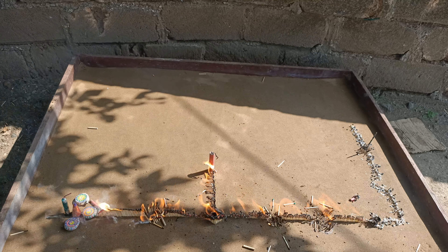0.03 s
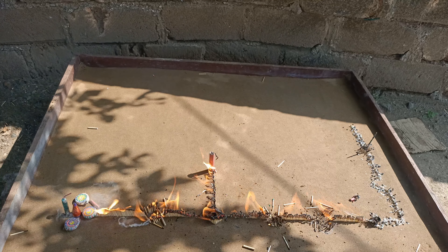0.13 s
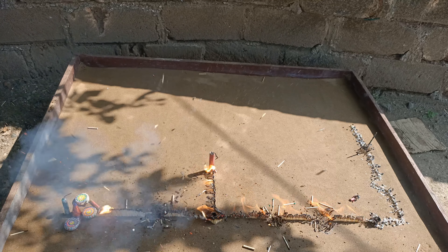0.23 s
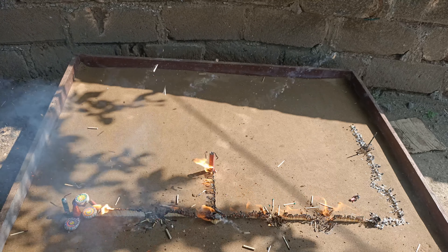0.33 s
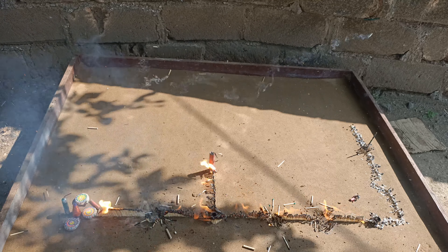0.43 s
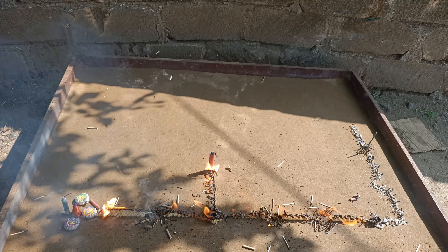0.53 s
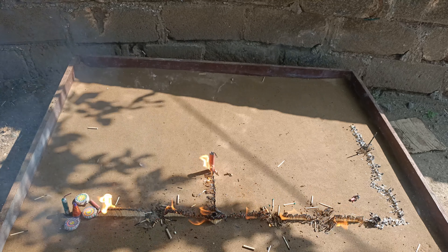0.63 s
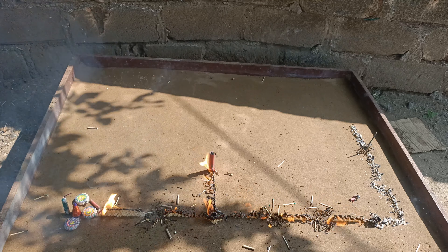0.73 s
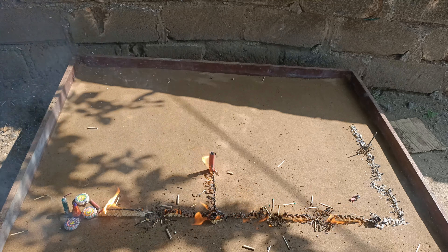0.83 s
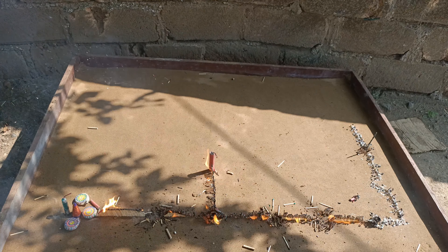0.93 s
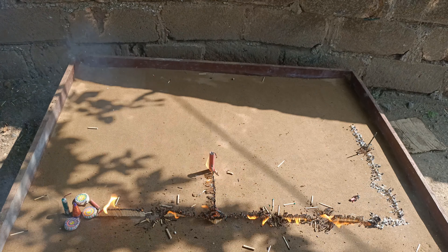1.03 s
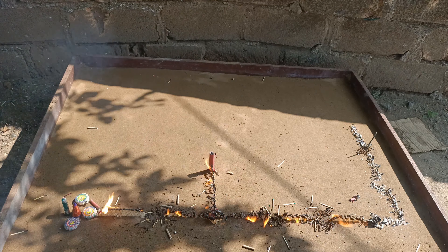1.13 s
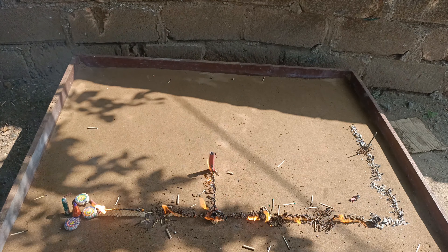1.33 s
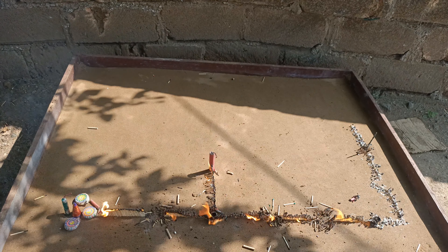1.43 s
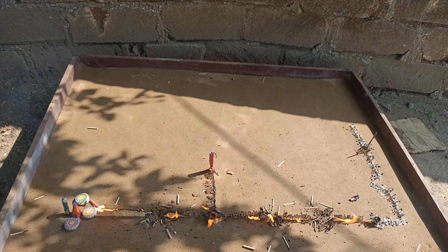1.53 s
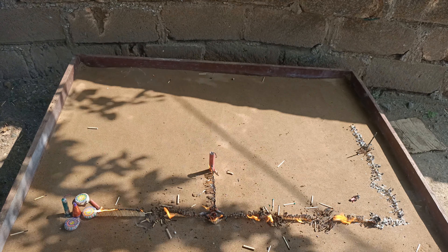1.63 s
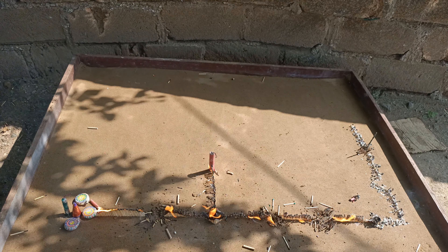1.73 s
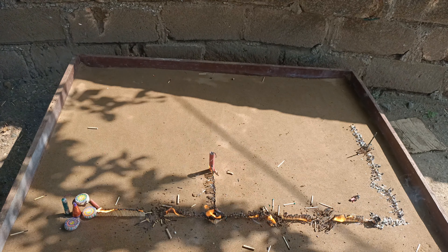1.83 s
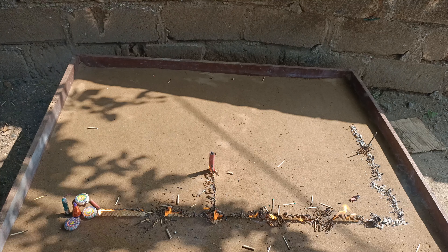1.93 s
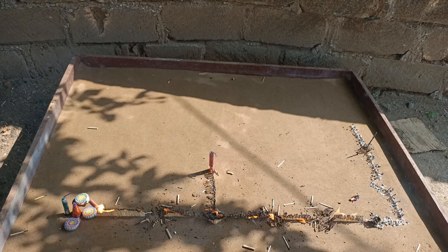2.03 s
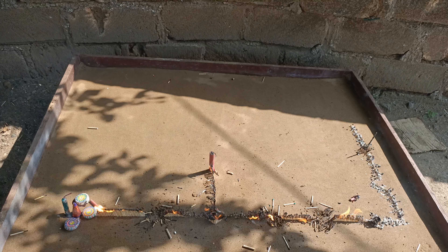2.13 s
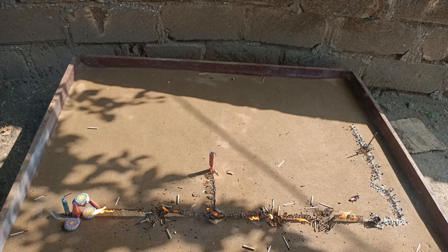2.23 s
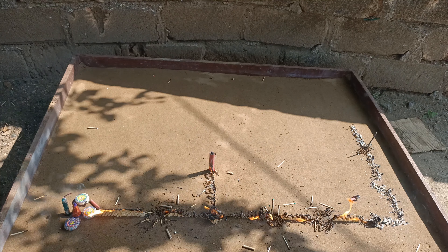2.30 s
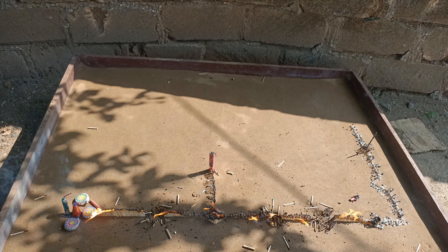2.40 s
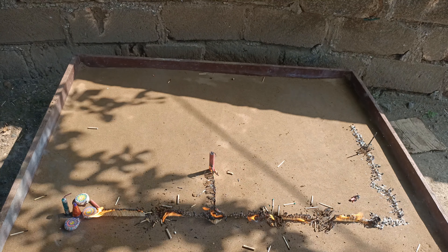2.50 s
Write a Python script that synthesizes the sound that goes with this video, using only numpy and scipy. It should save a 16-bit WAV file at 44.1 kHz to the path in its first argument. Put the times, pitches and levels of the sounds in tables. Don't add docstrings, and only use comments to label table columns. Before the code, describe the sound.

After a quiet moment of thin fizzing, a single firecracker cracks violently near a stereo microphone outdoors. Walls throw back a dense, boxy echo, a thin metal ring lingers faintly, then low wind bumps and quiet air.

```python
import sys
import numpy as np
from scipy import signal
from scipy.fft import rfft, irfft
from scipy.io import wavfile
from scipy.ndimage import uniform_filter1d, map_coordinates

SR = 44100
rng = np.random.default_rng(int(sys.argv[2]) if len(sys.argv) > 2 else 0)


def gain_from_db(level_db):
    decades = np.asarray(level_db, float) / 20
    return 10 ** decades


def master(y):
    cut = np.clip(np.atleast_2d(y).T, -1, 1)
    pcm = np.round(cut * 32767)
    wavfile.write(sys.argv[1], SR, pcm.astype(np.int16))


N = 110250
T = np.arange(N) / SR
BANG_S = .2296


def unit(x):
    return x / np.sqrt(np.mean(x ** 2) + 1e-20)


def along(points, hz):
    f, v = np.transpose(points)
    return np.interp(np.log(hz + 1), np.log(f + 1), v)


def curves(rows):
    s, *cols = np.transpose(rows)
    return [np.interp(T, s, c) for c in cols]


def wobble(rate):
    knots = rng.standard_normal(int(N * rate / SR) + 4)
    return map_coordinates(knots, [T * rate])


def panned(x, pan_db):
    left_db, right_db = np.minimum(pan_db, 0), np.minimum(-pan_db, 0)
    return x * gain_from_db(np.array([left_db, right_db])).reshape(2, -1)


def rush(spectrum, alike, lag_s=0):
    hz = np.fft.rfftfreq(N, 1 / SR)
    a, b = rfft(rng.standard_normal((2, N))) * gain_from_db(along(spectrum, hz))
    turn = np.arccos(np.clip(along(alike, hz), -1, 1)) / 2
    lag = np.exp(-1j * np.pi * hz * lag_s)
    mid, side = a * np.cos(turn), b * np.sin(turn)
    return unit(irfft([(mid + side) * lag, (mid - side) / lag], N))


def burst(s, hz, length_s):
    return np.exp(-.5 * ((T - s) / length_s) ** 2) * np.cos(2 * np.pi * hz * (T - s))


def ring(hz, db, t60, swell_s, shake):
    t = np.maximum(T - BANG_S, 0)
    phase = shake * (wobble(hz / 25) + 0.4 * np.array([wobble(35), wobble(4)]))
    decay = gain_from_db(db - 60 * t / t60 + 1.2 * wobble(29))
    return decay * (1 - np.exp(-t / swell_s)) * np.sin(2 * np.pi * hz * t + phase)


# pitch_hz, level_db [dB per Hz]
AIR_COLOUR = [(100, -32.5), (150, -8), (280, -23), (420, -15), (1000, -22.5), (3500, -24.5), (6500, -36),
              (15800, -42.5)]
# pitch_hz, likeness [-1..1]
AIR_LIKENESS = [(60, 0.08), (180, 0.53), (550, 0.056), (1650, 0.19), (4970, -0.073), (15000, -0.07)]
# start_s, level_db
AIR_LOUDNESS = [(0, -56), (.16, -57), (.2, -51.5), (.9, -59.5), (1.5, -59.5), (1.82, -60.5), (1.88, -62),
                (2.06, -59), (2.12, -57), (2.47, -60.5), (2.5, -59)]


def air():
    drift_db = .6 * wobble(9)
    return gain_from_db(curves(AIR_LOUDNESS)[0] + drift_db) * rush(AIR_COLOUR, AIR_LIKENESS)


# start_s, level_db, pan_db
GUSTS = [(0, -42.5, -6.5), (.1, -60.5, 4), (.62, -56, 6.5), (.8, -57.5, -2.5), (.95, -62, 0),
         (1.06, -61.5, 1.5), (1.13, -50.5, 15), (1.2, -56, 1), (1.29, -49.5, 6), (1.42, -59.5, -1),
         (1.56, -54, -2), (1.68, -50.5, 4.5), (1.82, -52.5, 4.5), (1.88, -59, 1.5), (2, -53.5, -2.5),
         (2.15, -57, -3), (2.27, -50.5, -10), (2.5, -53, 1)]
# pitch_hz, level_db [dB per Hz]
WIND_COLOUR = [(8.8, -42), (15, -4), (57, -4.5), (151, -16.5), (249, -30), (300, -28), (390, -48.5),
               (660, -120)]
# start_s, level_db [peak], pitch_hz, length_s, pan_db
PORT_EDDIES = [
    (1.515, -37, 55, .016, -18),
    (2.432, -27, 84, .011, -24),
    (2.468, -34, 60, .012, -16),
    (2.328, -35, 55, .01, -14),
    (2.247, -39, 55, .012, 6),
]


def wind():
    strength_db, pan_db = curves(GUSTS)
    lumps = gain_from_db(2.3 * np.array([wobble(14), wobble(9.2)]))
    turbulence = unit(lumps * rush(WIND_COLOUR, [(60, 0.12)]))
    buffet = panned(gain_from_db(strength_db + 4.5) * turbulence, pan_db)
    eddies = sum(panned(gain_from_db(db) * burst(s, hz, length), side_db)
                 for s, db, hz, length, side_db in PORT_EDDIES)
    return buffet + eddies


EMBER_DB, FLARE_EDGE_S, SPELL_DB = -68, 0.013, 1.17
# start_s, length_s, level_db
FLARES = [(-.02, 0.17, -56.5), (.172, .07, -57.5), (.585, 0.073, -55.5), (.745, .16, -58.5),
          (.93, 0.13, -66), (1.08, .16, -61), (1.28, .26, -63.5), (1.56, 0.04, -64.5), (1.62, .11, -65),
          (1.75, .05, -64), (1.8, .028, -62), (1.895, 0.02, -65), (1.95, .11, -67), (2.09, .27, -62),
          (2.361, .16, -63.5)]
# pitch_hz, level_db [dB per Hz]
FIZZ_COLOUR = [(1200, -21.5), (2600, -9.5), (4300, -5.5), (5150, -3), (6000, -11.5), (8500, -25.5),
               (13000, -22.5), (15800, -27)]
# start_s, level_db [peak], pitch_hz, pan_db
FUSE_SPITS = [
    (0.956, -51, 12800, -4),
    (.955, -59, 8970, -3),
    (1.095, -58, 7500, 5),
    (1.82, -60, 6500, -3),
    (2.498, -59, 1510, 4),
]


def fuse():
    flares = 0
    for s, length, db in FLARES:
        gate = np.clip(np.minimum(T - s, s + length - T) / FLARE_EDGE_S + .5, 0, 1)
        flares = flares + gain_from_db(db + SPELL_DB) * gate
    sputter = gain_from_db(.6 * wobble(25) + 1.5 * wobble(90))
    alike = [(1000, 0.87)]
    before = rush(FIZZ_COLOUR, alike, lag_s=0.00067)
    after = rush(FIZZ_COLOUR, alike, lag_s=-.00014)
    fizz = np.where(T < BANG_S, before, after)
    spits = sum(panned(gain_from_db(db) * burst(s, hz, 2.5 / hz), pan_db)
                for s, db, hz, pan_db in FUSE_SPITS)
    return np.maximum(flares, gain_from_db(EMBER_DB)) * sputter * fizz + spits


# pitch_hz, level_db, t60_s
SHEET_MODES = [
    (808, -54, 3.2),
    (826, -60.5, 2.4),
    (865, -58, 2.9),
    (1190, -63.5, 2.6),
]


def sheet():
    return sum(ring(hz, db, t60, swell_s=0.3, shake=1.1) for hz, db, t60 in SHEET_MODES)


# pitch_hz, level_db, t60_s, swell_s
BOXED_AIR = [
    (182, -25, .52, .12),
    (215, -23, .52, .14),
    (246, -22, .48, .14),
    (272, -25, .45, .12),
]


def boom():
    return sum(ring(hz, db, t60, swell, shake=.5) for hz, db, t60, swell in BOXED_AIR)


# pitch_hz, t60_s
WALL_DECAY = [(50, 1), (200, 0.7), (500, 0.56), (2500, 0.53), (5500, 0.47), (8000, .36), (12000, 0.28)]


def dying(x, longer):
    hz, t, z = signal.stft(x, SR, nperseg=512)
    t60 = longer * along(WALL_DECAY, hz)[:, None]
    fade = gain_from_db(-60 * np.maximum(t - BANG_S, 0) / t60)
    onset = np.clip((T - BANG_S) / .0004, 0, 1)
    return signal.istft(z * fade, SR, nperseg=512)[1][:, :N] * onset


# pitch_hz, level_db [dB per Hz]
BLAST_COLOUR = [(95, -16.5), (170, -6.5), (450, -7), (1300, -9), (2600, -2.5), (4500, -5.5), (8500, -21.5),
                (15500, -22.5)]
# pitch_hz, likeness [-1..1]
ECHO_LIKENESS = [(40, 0.37), (200, 0.85), (500, .15), (1400, -.2), (4000, 0)]
# start_s [after the bang], level_db, length_s
WALL_SLAPS = [
    (0.017, 1.5, .006),
    (0.054, 2, 0.005),
    (0.059, -4.5, .0035),
    (0.0701, 2.5, 0.0027),
    (0.185, 0.5, .012),
]


def echoes():
    slaps_db = sum(db * burst(BANG_S + late, 0, length) for late, db, length in WALL_SLAPS)
    flutter_db = 1.2 * wobble(300) + 0.8 * np.array([wobble(120), wobble(120)])
    near = dying(rush(BLAST_COLOUR, ECHO_LIKENESS), 0.92) * gain_from_db(slaps_db + flutter_db)
    far = gain_from_db(-36) * dying(rush(BLAST_COLOUR, ECHO_LIKENESS), 3.65)
    return gain_from_db(-1.5) * (near + far)


PUSH_S, SUCK_S, SUCK_HZ = .0003, .0008, 480


def cracker():
    s = BANG_S + np.array([[.0001], [0]])
    push = 0.52 * burst(s + PUSH_S / 2, 0, PUSH_S / 3)
    suction = burst(s + SUCK_S, SUCK_HZ, SUCK_S / 2)
    shock = gain_from_db(2) * (push - suction)
    thump_s = .282 + np.array([[.0035], [0]])
    thump = gain_from_db(-19.5) * burst(thump_s, 48, length_s=0.024)
    return shock + echoes() + boom() + thump


def scene():
    return air() + wind() + fuse() + sheet() + cracker()


def low_pass(x):
    return signal.sosfilt(signal.butter(12, 15830, fs=SR, output="sos"), x)


CEILING_DB, RECOVER_S, CLIP_HARD = -7.5, .012, 5


def record(dry):
    size = max(int(RECOVER_S * SR), 3)
    power = np.abs(uniform_filter1d(np.mean(dry ** 2, 0), size, origin=-(size // 2)))
    x = dry / (1 + (power / gain_from_db(2 * CEILING_DB)) ** 2) ** 0.29
    x = x / (1 + np.abs(x) ** CLIP_HARD) ** (1 / CLIP_HARD)
    return low_pass(x)


dry = scene()
out = record(dry)
master(out)
```